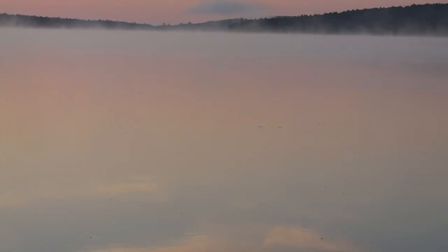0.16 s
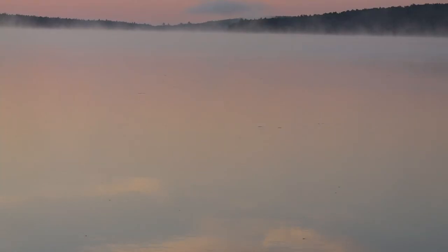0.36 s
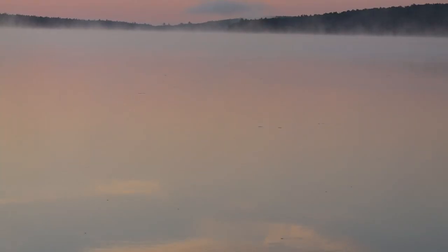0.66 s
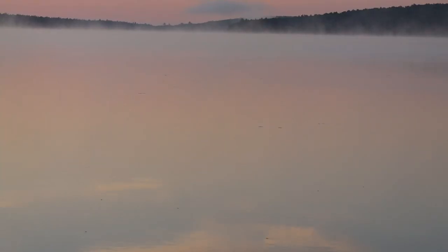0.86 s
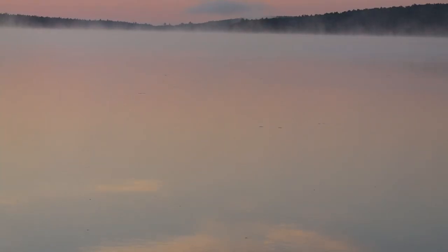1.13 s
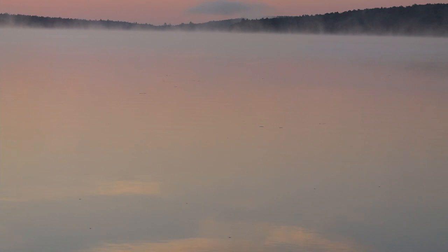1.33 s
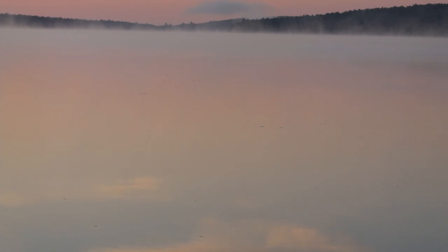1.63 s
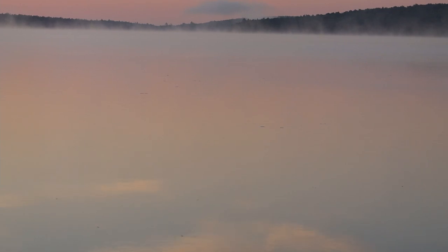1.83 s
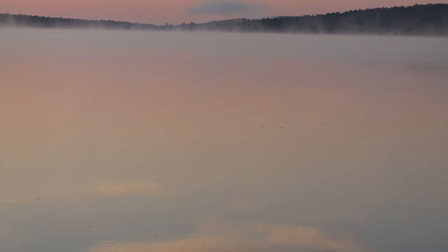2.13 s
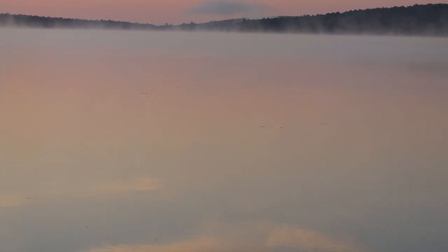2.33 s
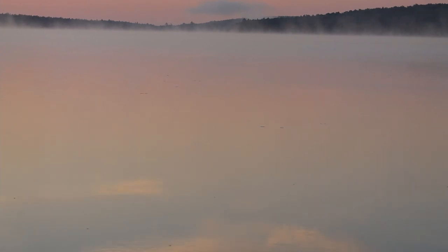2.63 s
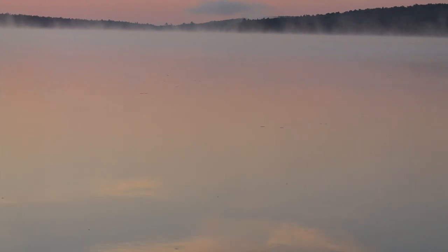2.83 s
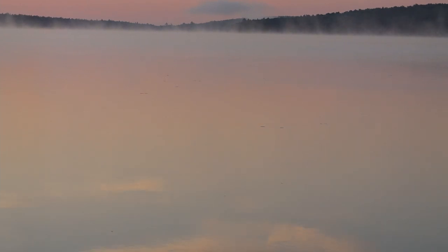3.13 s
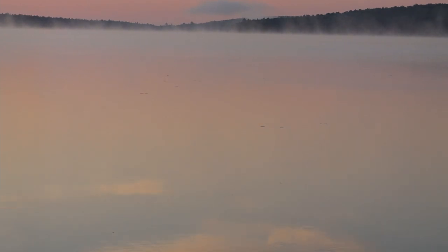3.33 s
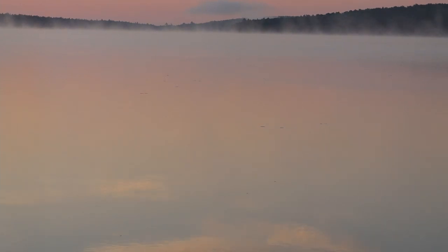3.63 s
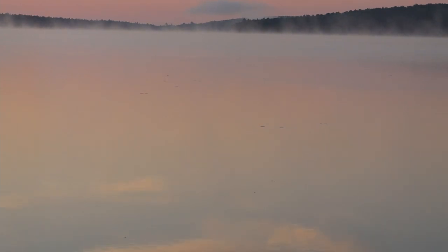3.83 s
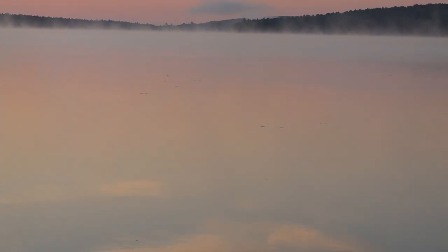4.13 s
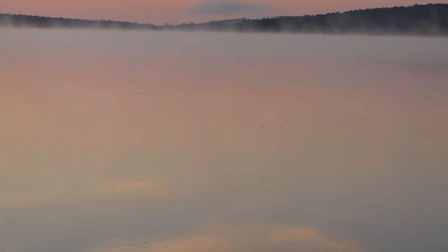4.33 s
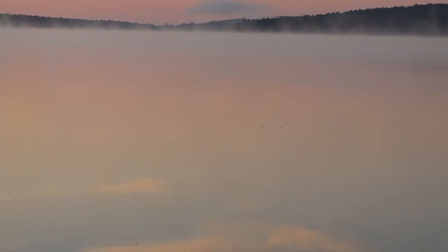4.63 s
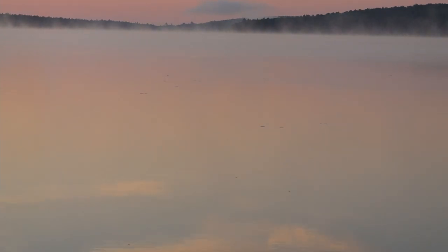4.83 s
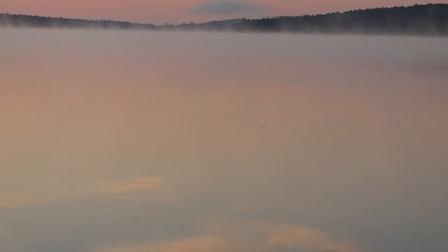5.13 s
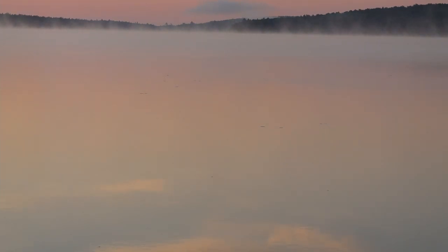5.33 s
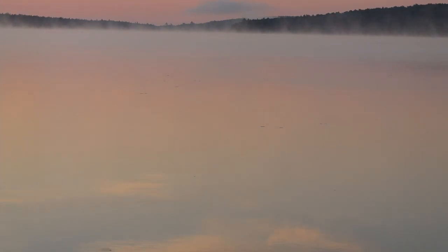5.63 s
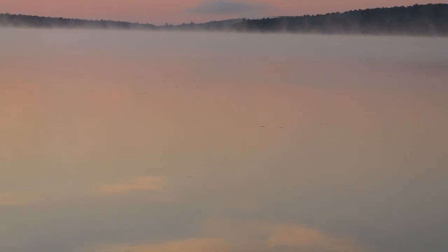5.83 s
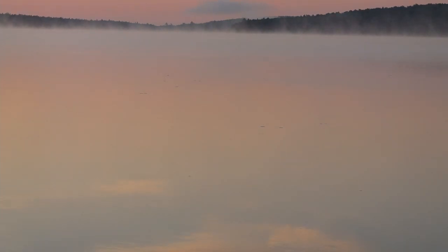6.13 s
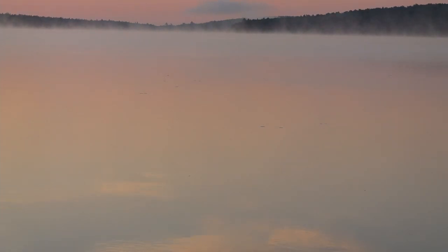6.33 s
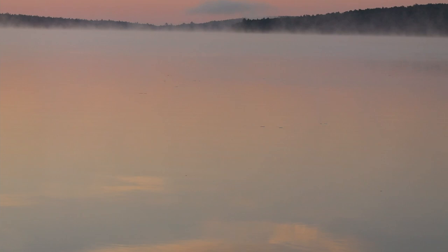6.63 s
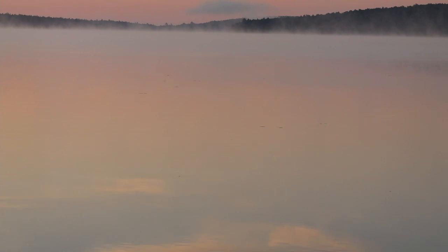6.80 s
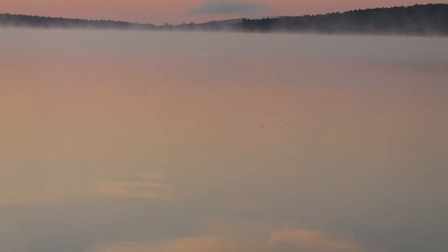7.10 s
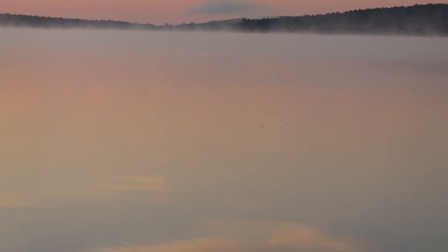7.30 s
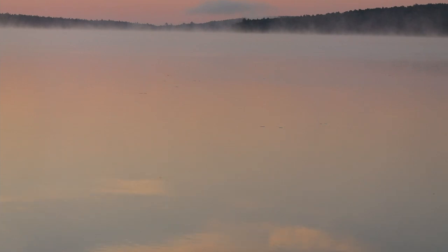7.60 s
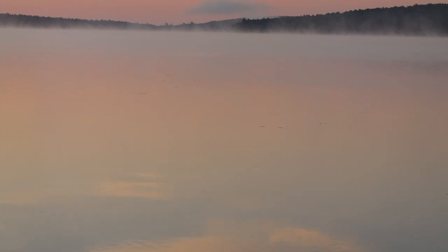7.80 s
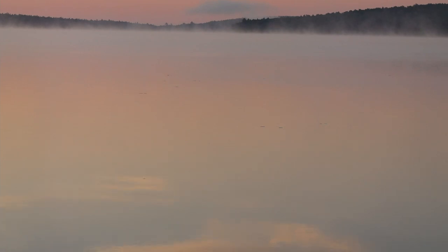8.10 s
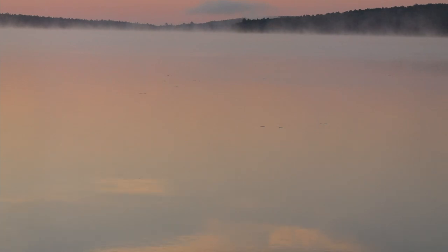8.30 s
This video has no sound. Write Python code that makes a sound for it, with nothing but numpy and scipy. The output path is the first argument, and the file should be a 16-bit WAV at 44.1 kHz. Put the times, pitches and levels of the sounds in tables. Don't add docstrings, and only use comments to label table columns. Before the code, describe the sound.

A loon's quavering tremolo whistles break between low and high across a still lake, echoing off the far shore, with faint distant songbirds and soft hiss.

```python
import sys
import numpy as np
from scipy import signal
from scipy.fft import rfft, irfft
from scipy.io import wavfile
from scipy.ndimage import map_coordinates

SR = 44100
rng = np.random.default_rng(int(sys.argv[2]) if len(sys.argv) > 2 else 0)


def output_pcm(signal):
    pcm = np.clip(np.atleast_2d(signal).T, -1, 1) * 32767
    wavfile.write(sys.argv[1], SR, np.round(pcm).astype(np.int16))


def natural_amplitude(level_db):
    exponent = np.asarray(level_db, float) / 20
    return 10 ** exponent


N = 373086


def at_hz(points, hz):
    point_hz, point_db = np.transpose(points)
    return np.interp(np.log(hz), np.log(point_hz), point_db)


def columns(rows, now):
    s, *rest = np.transpose(rows)
    return [np.interp(now, s, column) for column in rest]


def add(out, s, sound):
    at = round(s * SR)
    out[at:at + len(sound)] += sound[:max(len(out) - at, 0)]


def fades(size, edge_s):
    n = np.arange(size)
    return np.sin(np.pi / 2 * np.clip(np.minimum(n, size - n) / (edge_s * SR), 0, 1)) ** 2


def drift(size, rate):
    knots = rng.standard_normal(int(size * rate / SR) + 4)
    return map_coordinates(knots, [1 + np.arange(size) * rate / SR], order=3)


def scattered(x, gap_s, t60):
    t = np.arange(min(3, gap_s + t60) * SR) / SR - gap_s
    white = rng.standard_normal(3 * SR)[:len(t)]
    response = white * natural_amplitude(-60 * t / t60) * np.clip(t / (0.094 * gap_s), 0, 1)
    return signal.oaconvolve(x, response / np.linalg.norm(response))[:N]


def coloured(spectrum):
    hz = np.maximum(np.fft.rfftfreq(N, 1 / SR), 1)
    noise = irfft(rfft(rng.standard_normal(N)) * natural_amplitude(at_hz(spectrum, hz)), N)
    return noise / noise.std()


def slur(length, start_hz, middle_hz, end_hz):
    burr_hz, burr_db, burr_per_s = 22, 1.9, 110
    way = np.arange(round(length * SR)) / (length * SR)
    curve = np.polyfit([0, .5, 1], [start_hz, middle_hz, end_hz], 2)
    pitch = np.polyval(curve, way) + burr_hz * drift(len(way), burr_per_s)
    level = natural_amplitude(burr_db * drift(len(way), burr_per_s) - 1) * fades(len(way), .13 * length)
    return np.sqrt(2) * np.sin(2 * np.pi * np.cumsum(pitch) / SR) * level


def chorus():
    # (t/s, level/dB)
    chorus_swell = [(0, -72), (.7, -72), (1.0, -64), (1.5, -72), (2.05, -67), (2.5, -76), (2.76, -68),
                    (2.95, -71), (3.3, -64.5), (4.0, -70), (4.6, -66), (5.501, -67), (6.399, -64),
                    (7.0, -67), (7.502, -63), (8.46, -68.5)]
    far = np.zeros(N)
    for when, long_share, a, b, c in rng.random((420, 5)):
        centre = 2550 + 1250 * a
        note = slur(0.044 + 0.064 * long_share, centre + 1100 * (b - .5), centre, centre + 900 * (c - .5))
        add(far, when * N / SR, note)
    far = .25 * far + scattered(far, .01, .6)
    return far / far.std() * natural_amplitude(columns(chorus_swell, np.arange(N) / SR)[0])


def whistle(length, start_hz, end_hz, db):
    size = round(length * SR)
    pitch = np.linspace(start_hz, end_hz, size) + 15 * drift(size, 45)
    beat_hz = 17 + 4.0 * drift(size, 13.2)
    beat = np.abs(1 + 0.49 * np.exp(2j * np.pi * np.cumsum(beat_hz) / SR))
    level = beat * natural_amplitude(db + 2.2 * drift(size, 26.6))
    return np.sqrt(2) * level * np.sin(2 * np.pi * np.cumsum(pitch) / SR) * fades(size, 0.015)


def songbirds():
    # (t/s, length/s, start f/Hz, end f/Hz, level/dB)
    slurred_notes = [(2.675, .05, 3260, 3020, -63), (2.865, .045, 3330, 3100, -66), (4.665, .04, 3250, 2700, -64),
                     (5.39, .05, 3330, 3230, -63), (7.13, .05, 3700, 3350, -67), (.325, .13, 3850, 2900, -65),
                     (.505, .03, 3050, 2550, -68), (.853, .04, 3600, 2600, -63), (.985, .06, 3250, 2560, -59),
                     (1.03, .05, 2700, 2220, -65), (.97, .04, 3230, 3100, -64), (1.35, .055, 3350, 2800, -66.5),
                     (1.64, .1, 4000, 2500, -71.5), (1.89, .065, 3250, 2250, -68.5), (2.7, .06, 3100, 2480, -68),
                     (2.72, .16, 3150, 3120, -65), (2.83, .07, 3650, 3200, -66), (3.89, .05, 2660, 2600, -67),
                     (5.245, .08, 3700, 2600, -64), (5.37, .09, 3300, 3040, -60), (5.6, .24, 3130, 3030, -61),
                     (6.32, .08, 2700, 2350, -68), (6.64, .05, 4050, 3500, -70), (6.25, .08, 2900, 2500, -68),
                     (6.5, .08, 2900, 2550, -67), (1.1, .06, 3100, 2400, -70), (7.85, .04, 5450, 4800, -71),
                     (8.08, .1, 2950, 2450, -68), (8.36, .045, 3250, 2800, -67),
                     (5.303, .09, 3305, 3320, -57), (2.96, .075, 2600, 3350, -65), (2.715, .04, 2600, 2750, -65),
             (2.775, .03, 3150, 3260, -66), (2.815, .035, 3300, 3500, -65), (5.865, .07, 3760, 3790, -67),
             (7.42, .04, 3000, 3180, -66), (.095, .07, 2600, 4200, -70), (.435, .035, 2880, 3800, -67),
             (1.11, .04, 3750, 3950, -68), (.775, .05, 2800, 3500, -65), (.62, .03, 3700, 3760, -68),
             (.88, .075, 2590, 2720, -61.5), (1.065, .055, 2400, 3850, -65), (1.415, .05, 2780, 3300, -68),
             (1.955, .075, 2450, 4100, -68), (2.635, .065, 3050, 3250, -67), (2.74, .06, 3250, 3650, -67),
             (5.85, .035, 3100, 3800, -67), (5.96, .12, 3850, 3950, -70), (6.695, .04, 3100, 3580, -61),
             (6.73, .11, 3540, 3500, -68), (5.43, .13, 3050, 3220, -57.5), (5.56, .05, 2650, 3150, -65),
             (5.49, .05, 2700, 3600, -68), (3.96, .07, 2800, 3350, -66), (6.89, .04, 3450, 3750, -67),
             (8.24, .06, 2620, 2700, -69)]
    # (t/s, length/s, start f/Hz, end f/Hz, level/dB)
    whistles = [(5.543, 0.16, 3268, 3280, -54.5), (6.174, 0.065, 4405, 4370, -55.5),
                (6.258, 0.23, 4395, 4422, -56), (6.497, 0.15, 4430, 4505, -59),
                (6.696, 0.13, 4480, 4430, -74), (6.836, 0.34, 4373, 4362, -56.5),
                (7.269, 0.34, 4290, 4250, -62), (7.615, 0.3, 4290, 4295, -61),
                (7.955, 0.134, 4325, 4290, -58.5), (8.102, 0.1, 4260, 4180, -58.5),
                (8.249, 0.069, 4260, 4360, -59), (8.373, 0.068, 4250, 4270, -62)]
    notes, held = np.zeros(N), np.zeros(N)
    for s, length, start_hz, end_hz, db in slurred_notes:
        share = .68 if end_hz < start_hz else 0.44
        note = slur(length, start_hz, start_hz + share * (end_hz - start_hz), end_hz)
        add(notes, s, natural_amplitude(db + 2.5 + 1.5 * drift(len(note), 30)) * note)
    for s, *note in whistles:
        add(held, s, whistle(*note))
    notes = natural_amplitude(-.5) * notes + natural_amplitude(-12) * scattered(notes, .002, .1)
    woods = natural_amplitude(-3.5) * scattered(notes, .015, .5)
    return notes + woods + held + natural_amplitude(-7) * scattered(held, .02, .5)


def low_call(rows, start=0, db=0, turning=1):
    s, hz, first_db, second_db = np.transpose(rows)
    half_turns = turning * np.where(np.diff(hz, append=0) > 0, 0.41, 0.18)
    dulling_db = -1.06 * (start + s)
    upper_db = db + np.maximum(first_db, second_db) - 17.5 + dulling_db
    return np.transpose([start + s, hz, db + first_db, db + second_db, upper_db, half_turns])


def high_call(entry, swings, colour, depth):
    # (t/s, lateness/s)
    trough_late = [(3.3, -0.014), (3.4, 0.004), (4.4, 0), (4.6, -.002), (5.67, -0.0073), (5.77, -0.0038),
                   (5.96, -0.0053), (6.2, 0), (7.2, -0.0016), (7.55, -0.0022), (7.7, -0.00099)]
    # (t/s, phase/half-turns)
    reflection_shift = [(3.255, 0.062), (3.26, 0.85), (4.2, 0.92), (4.25, 0.052), (4.28, 0.06),
                        (4.295, 0.94), (4.66, 0.92), (4.69, 0.019), (6.05, 0.11), (6.35, 0.64), (6.9, 0.29),
                        (7.02, .03), (7.04, 0.71), (7.545, 0.87), (7.585, .03), (7.65, 0.57), (7.71, 0.51),
                        (7.75, 0.051)]
    s, hz, crest_db, trough_db = np.transpose(swings)
    middle_s = (s[1:] + s[:-1]) / 2
    last_fall_s = 0.051
    trough_s = np.append(middle_s + columns(trough_late, middle_s)[0], s[-1] + last_fall_s)
    trough_hz = np.linspace(*depth, len(s)) * np.append((hz[1:] + hz[:-1]) / 2, hz[-1])
    pairs = np.stack([[s, hz, crest_db], [trough_s, trough_hz, trough_db]], axis=2)
    s, hz, db = np.column_stack([np.transpose(entry), pairs.reshape(3, -1)])
    way = np.linspace(-1, 1, len(s))
    crest_or_trough = np.arange(len(s)) % 2
    arch_db = -4 * way ** 2
    octave_db, upper_db = np.reshape(colour[:-1], (2, 2))[:, crest_or_trough] + arch_db
    upper_db += colour[-1] * way / 2
    upper_db[[0, -1]] -= 9
    return np.transpose([s, hz, db, octave_db, upper_db, columns(reflection_shift, s)[0]])


def phrases():
    # (t/s, f/Hz, fundamental level/dB, octave level/dB)
    wide_quavers = [
        [(2.915, 679, -46, -50), (2.945, 691, -43, -43.5), (2.975, 660, -46, -49), (2.988, 658, -54, -64),
         (2.998, 673, -43, -56), (3.008, 730, -43.5, -44), (3.027, 793, -60, -31.5), (3.041, 815, -43.5, -33),
         (3.056, 799, -52, -32.5), (3.095, 724, -40, -52.5), (3.121, 796, -57, -31), (3.133, 826, -40, -43),
         (3.145, 869, -37, -38), (3.156, 866, -40, -51), (3.166, 800, -51, -36), (3.18, 757, -42, -52),
         (3.195, 720, -38.5, -47), (3.227, 794, -53, -30), (3.233, 851, -42, -44), (3.239, 897, -38, -42),
         (3.247, 940, -38.5, -50), (3.258, 1000, -54, -58)],
        [(3.484, 791, -58, -64), (3.497, 724, -41.5, -42.5), (3.507, 711, -43.5, -39), (3.523, 735, -41.5, -44),
         (3.537, 820, -65, -35), (3.549, 848, -41.5, -47), (3.566, 809, -57, -34), (3.577, 744, -39.5, -43),
         (3.592, 708, -41.5, -38), (3.618, 656, -45.5, -53), (3.636, 718, -41.5, -37.5),
         (3.662, 750.5, -38.5, -33), (3.688, 722, -41, -36), (3.702, 650, -51.5, -51), (3.723, 615, -70, -58)],
    ]
    # (t/s, f/Hz, level/dB)
    breaks = [
        [(3.238, 1023, -35), (3.25, 1138, -39)],
        [(4.26, 1105, -42.5), (4.298, 1038, -33)],
        [(5.599, 1094, -38), (5.609, 1140, -29.5)],
        [(7.011, 1017, -41), (7.04, 1022, -44)],
    ]
    # (crest t/s, crest f/Hz, crest level/dB, next trough level/dB)
    call_swings = [
        [(3.258, 1146, -28, -46.5), (3.344, 1166, -27.5, -43.5), (3.446, 1119, -35, -40.5)],
        [(4.35, 1187, -29.5, -31), (4.444, 1180, -30, -30.5), (4.546, 1190, -28, -30.5),
         (4.645, 1190, -31.5, -31), (4.741, 1155, -38.5, -32), (4.847, 1151, -35.5, -33.5),
         (4.957, 1112, -31, -36)],
        [(5.621, 1136, -29.5, -35), (5.717, 1176, -28.5, -31.5), (5.811, 1166, -27, -32),
         (5.911, 1178, -25, -30.5), (6.01, 1175, -25.5, -35.5), (6.116, 1145, -28, -39),
         (6.218, 1141, -27, -44.5), (6.328, 1105, -30.5, -42)],
        [(7.088, 1155, -29.5, -44.5), (7.186, 1156, -31, -43.5), (7.283, 1183, -27.5, -42),
         (7.383, 1179, -29, -41), (7.489, 1146, -34, -36), (7.593, 1147, -39, -36.5), (7.706, 1092, -41, -37.5),
         (7.82, 1054, -36, -41)],
    ]
    # (octave on crests/dB, in troughs/dB, overtones on crests/dB, in troughs/dB, change/dB)
    colours = [(-57, -60.5, -56, -67, -10), (-53.5, -74, -54.5, -56.5, -3.5),
               (-50.5, -69.5, -58.5, -56.5, 1.5), (-53, -59, -59, -61.5, -6)]
    depths = [(.888, .89), (0.9, .9), (.905, .89), (.895, .9)]
    # (t/s, length/s, f/Hz, fundamental level/dB, octave level/dB)
    strays = [
        (3.412, 0.06, 705, -62.5, -48.5),
        (3.731, 0.052, 625, -62, -52.5),
        (5.161, 0.064, 555, -61, -65),
        (7.758, 0.042, 744, -53.5, -72.5),
        (7.857, 0.019, 657, -45, -42.5),
    ]
    # (t/s, f/Hz, fundamental level/dB, octave level/dB)
    surging_lead = [(4.158, 624, -72, -57), (4.18, 627, -67, -45), (4.216, 663, -53, -48),
                    (4.24, 767, -37, -31), (4.252, 778, -40, -39), (4.258, 851, -49, -35),
                    (4.265, 890, -46, -53), (4.275, 918, -55, -42)]
    # (t/s, low surge/dB, high yelp/dB, last drop/dB)
    cracks = [
        (5.007, -36.5, -30.5, -48),
    ]
    # (t after its start/s, f/Hz, fundamental level/dB, octave level/dB)
    crack_surge = [(0.001, 662, -17, -1.5), (0.032, 695, -19, -2.5), (.042, 720, -5, -8),
                   (.062, 833, -2, 6)]
    # (t/s, f/Hz, fundamental level/dB, octave level/dB)
    crack_yelp = [(.051, 1085, -1, -27), (0.099, 987, -9, -24)]
    # (t/s, f/Hz, fundamental level/dB, octave level/dB)
    crack_drop = [(.095, 640, -4, 9), (0.119, 640, -15, -23)]
    # (t/s, f/Hz, fundamental level/dB, octave level/dB)
    wavering_lead = [(5.497, 711, -45, -61), (5.513, 681, -67, -35.5), (5.536, 720, -47.5, -35),
                     (5.565, 688, -59, -35.5), (5.58, 714, -52, -35.5), (5.59, 757, -40, -47),
                     (5.598, 815, -38, -31), (5.608, 877, -45, -30)]
    # (t/s, f/Hz, fundamental level/dB, octave level/dB)
    soft_crack = [
        [(6.376, 690, -42, -36), (6.388, 685, -49, -45), (6.402, 670, -48, -47), (6.416, 728, -53, -38),
         (6.424, 776, -47, -44), (6.434, 840, -50, -52)],
        [(6.423, 1054, -39, -68), (6.44, 1050, -41, -56), (6.452, 1040, -43, -56), (6.458, 1004, -48, -58),
         (6.48, 975, -44, -68)],
        [(6.472, 654, -51, -52), (6.484, 627, -49.5, -52), (6.498, 607, -65, -67)],
    ]
    # (t/s, f/Hz, fundamental level/dB, octave level/dB)
    stumbling_lead = [(6.902, 585, -54.5, -76), (6.939, 586, -56.5, -58.5), (6.953, 674, -47, -51),
                      (6.979, 766, -53, -30.5), (6.99, 814, -44, -39), (6.995, 858, -40, -39),
                      (7.002, 842, -41.5, -50), (7.024, 859, -44, -52)]
    # (t/s, f/Hz, fundamental level/dB, octave level/dB)
    low_quavers = [
        [(8.297, 606, -53, -63), (8.363, 593, -51.5, -54), (8.383, 658, -46, -42.5), (8.413, 679, -44, -37),
         (8.459, 617, -48, -43)],
    ]
    out = [low_call(rows, turning=0) for rows in wide_quavers]
    out += [high_call(*call) for call in zip(breaks, call_swings, colours, depths)]
    leads = [surging_lead, wavering_lead, stumbling_lead]
    out += [low_call(rows) for rows in leads + soft_crack + low_quavers]
    for s, *levels in cracks:
        for part, db in zip([crack_surge, crack_yelp, crack_drop], levels):
            out.append(low_call(part, s, db))
    for s, length, hz, *db in strays:
        out.append(low_call([(0, hz, *db), (length / 2, hz, *db), (length, hz * 0.918, *db)], s))
    return out


def glide(s, hz, turn, way):
    slope = np.diff(hz) / np.diff(s)
    product = slope[1:] * slope[:-1]
    inner = np.where(product > 0, 2 * product / (slope[1:] + slope[:-1] + 1e-9), 0)
    tangent = np.concatenate([slope[:1], inner, slope[-1:]])
    span = np.diff(s)[turn]
    bend = span * way * (1 - way) * ((1 - way) * tangent[turn] - way * tangent[turn + 1])
    return hz[turn] + np.diff(hz)[turn] * way ** 2 * (3 - 2 * way) + bend


def swing(now, way, rising):
    # (t/s, lead on the way up/half swings, trough shoulders/ratio, crest pointing/power)
    swing_shape = [(3.3, -0.09, .1, 0.96), (4.3, -0.0031, 1.5, 0.73), (4.65, -0.011, 1, 1.1),
                   (4.9, -0.0045, 1.16, 1.12), (5.7, 0.055, 0.095, 0.63), (6.0, 0.034, 0.062, 0.83),
                   (6.3, 0.011, 0.088, 1.04), (7.1, 0.0071, .6, 1.06), (7.4, .03, 1, 0.91),
                   (7.7, 0.018, 0.49, 1.84)]
    # (t/s, lead/half swings)
    level_lead = [(3.35, .0), (4.35, 0), (4.5, 0.0051), (4.66, 0.07), (4.75, 0.00058), (6.3, 0.0051),
                  (7.1, 0.0052), (7.4, 0.051), (7.6, 0.0061)]
    early, shoulders, pointing = columns(swing_shape, now)
    ahead = columns(level_lead, now)[0] + np.where(rising, early, -early)
    change_share = 0.68
    eased = .5 - .5 * np.cos(np.pi * np.clip(.5 + (way - .5 + ahead) / change_share, 0, 1))
    height = np.where(rising, eased, 1 - eased)
    low = (1 - height) * (1 + shoulders * height)
    high = height ** np.maximum(pointing, .1)
    return eased, np.where(rising, low, high), np.where(rising, high, low)


def head_turns(now):
    # (t/s, octave level/dB, third level/dB, fourth level/dB)
    head_levels = [(3.04, 2.5, 4, 1.5), (3.1, 1.5, -3, -2), (3.14, 3, 2, 9.5), (3.2, 0, -5, 2),
                   (3.24, 1.5, 0, 2), (3.27, 2, 7, -1), (3.35, 2.5, 6.5, -4), (3.45, 2, 0, -4),
                   (3.56, 1, 1, 1.5), (3.66, -1.5, -2, 1), (4.3, 0, 0.5, 3), (4.35, -3, 1, -3),
                   (4.4, 9, -6, 3.5), (4.45, -1, 6.5, -5), (4.5, 13, -8, 4), (4.55, -3, 0, -4),
                   (4.6, 9, 0, 4), (4.645, -1, 3.5, -2), (4.69, 1, -1, 3), (4.75, 3, 0, 1), (4.8, -4, 4, 0),
                   (4.85, 2, -11, 2), (4.91, -2, 6, -2), (4.96, -3, 0.5, 0), (5.66, -2, 6, 3.5),
                   (5.83, 1, -1, -4), (5.951, -0.5, -8, 3.5), (6.17, -2, 7.5, 0), (6.22, 1, -2, 6),
                   (6.28, 2, 5, -5), (6.33, -7, 2, 6), (6.4, -1, 5, 0), (6.97, -1, 2, -3),
                   (7.09, -3, -6, -8), (7.135, 3, -4, 5), (7.19, -5, 3, -9), (7.235, 1, -4, 0),
                   (7.29, -1, 0, -8), (7.38, -1, -7, -5), (7.435, -2, 2, -2), (7.47, 2, -10, -3),
                   (7.51, 3, 4, 3.5), (7.55, -8, 13, -1), (7.6, 1, -8, 1), (7.65, -11, 9, 0),
                   (7.7, -3, 0, -5), (7.76, 2, -8, -18), (7.82, -14, 16.5, -8), (7.855, -5, -5, -3)]
    # (t/s, level/dB)
    fifth_level = [(3.04, 1.5), (3.12, 1.5), (3.15, -18), (3.17, 4), (3.23, 1), (3.53, -8), (3.58, 4),
                   (3.62, -6), (3.66, 8), (4.2, -3), (7.0, -4)]
    return dict(zip([2, 3, 4, 5, 6], columns(head_levels, now) + columns(fifth_level, now) + [-8.5]))


def phrase(rows):
    # (f/Hz, level/dB)
    throat = [(1800, -22), (2500, -4.5), (3200, -3), (3700, -5.5), (4250, 0), (4800, -12.5), (5600, -23),
              (7000, -33)]
    # (t/s, width/s, level/dB)
    brief_swells = [(3.277, 0.01, -5), (4.82, 0.013, 0), (4.88, 0.011, 3), (5.64, .01, 2), (5.739, 0.0089, 2.5),
                    (5.79, .015, -1.5), (6.346, .005, -3), (7.611, 0.0047, -7), (7.73, .02, 1.5),
                    (7.765, 0.011, -3.5)]
    bounce_s, bounce_share = 0.0034, 0.48
    s, turn_hz, first_db, second_db, upper_db, half_turns = np.transpose(rows)
    count = np.arange(len(s))
    place = np.interp(np.arange(s[0], s[-1], 1 / SR), s, count)
    turn = np.minimum(place.astype(int), len(s) - 2)
    way = place - turn
    now = np.interp(place, count, s)
    rising = np.diff(turn_hz)[turn] > 0
    eased, old_weight, new_weight = swing(now, way, rising)
    head_db = head_turns(now)
    hz = glide(s, turn_hz, turn, way)
    phase = 2 * np.pi * np.cumsum(hz) / SR
    turned = np.exp(1j * np.pi * np.clip(half_turns, 0, 1))[turn]
    tone = 0
    for k, db in enumerate([first_db, second_db], 1):
        old, new = old_weight * natural_amplitude(db)[turn], new_weight * turned * natural_amplitude(db)[turn + 1]
        tone += np.abs(old + new) * natural_amplitude(head_db.get(k, 0)) * np.sin(k * phase)
    tone *= natural_amplitude(sum(db * np.exp(-((now - mid_s) / wide_s) ** 2) for mid_s, wide_s, db in brief_swells))
    upper = np.interp(turn + eased, count, upper_db)
    for k in range(3, 7):
        comb = np.abs(1 + bounce_share * np.exp(2j * np.pi * k * hz * bounce_s))
        level_db = upper + at_hz(throat, k * hz) + head_db[k] + 1.6 * drift(len(hz), 28.7)
        tone += natural_amplitude(level_db) * comb * np.sin(k * phase)
    return np.sqrt(2) * tone * fades(len(tone), .011) * natural_amplitude(.5 * drift(len(tone), 86.5))


def loon():
    # (t/s, level/dB)
    facing = [(3.3, -0.5), (4.6, -1.5), (6.0, -5.5), (7.4, 3.5)]
    # (extra delay t/s, pitch/ratio, level/dB)
    shores = [(0, 1.0, -2.5), (.07, 1.035, -2), (.19, 1.07, -11.5), (.33, 1.1, -12.5)]
    direct, ahead = np.zeros(N), np.zeros(N)
    for rows in phrases():
        start, tone = rows[0][0], phrase(rows)
        add(direct, start, tone)
        sent = tone * natural_amplitude(columns(facing, start)[0])
        n = np.arange(len(sent))
        for delay, raised, db in shores:
            add(ahead, start + delay, natural_amplitude(db) * np.interp(np.arange(0, len(sent), raised), n, sent))
    thin = signal.sosfilt(signal.butter(2, 900, "high", fs=SR, output="sos"), ahead)
    near_bank = natural_amplitude(-32) * scattered(direct, 0.0305, .25)
    far_shore = natural_amplitude(-21) * scattered(thin, 0.026, 5)
    return direct + near_bank + far_shore


def ticks():
    # (t/s, peak level/dB, f/Hz, t60/s)
    taps = [
        (4.657, -46, 414, 0.033),
        (5.074, -33, 2160, 0.0031),
        (5.157, -35, 1855, 0.0071),
        (5.157, -43, 6864, 0.0083),
    ]
    out, t = np.zeros(N), np.arange(SR // 20) / SR
    for s, db, hz, t60 in taps:
        ring = natural_amplitude(db - 60 * t / t60) * np.sin(2 * np.pi * hz * t)
        add(out, s, ring)
        add(out, s + 0.004023, 0.71 * ring)
    return out


def scene():
    # (f/Hz, level per Hz/dB)
    mid_hiss = [(12, -38), (20, -14), (47, -8), (129, -7.5), (429, -12), (1990, -17.5), (12200, -23.5),
                (15600, -23)]
    # (f/Hz, level per Hz/dB)
    side_hiss = [(20, -17), (60, -18), (141, -4), (363, -2), (1830, -5.5), (3280, -5.5), (14000, -9.5),
                 (15600, -5)]
    mid = natural_amplitude(-57) * coloured(mid_hiss) + chorus() + songbirds() + loon() + ticks()
    side = natural_amplitude(-69.9) * coloured(side_hiss)
    return np.array([mid + side, mid - side])


def band_limit(x):
    return signal.sosfilt(signal.butter(12, 15780, fs=SR, output="sos"), x)


def record(dry):
    return band_limit(dry + .0005)


dry = scene()
out = record(dry)
output_pcm(out)
```